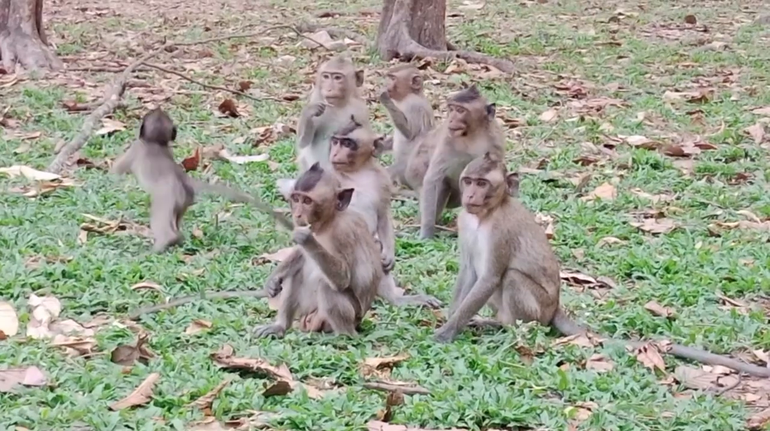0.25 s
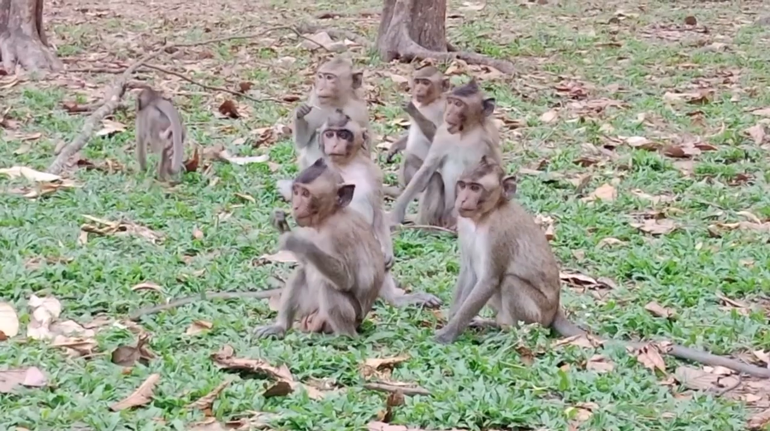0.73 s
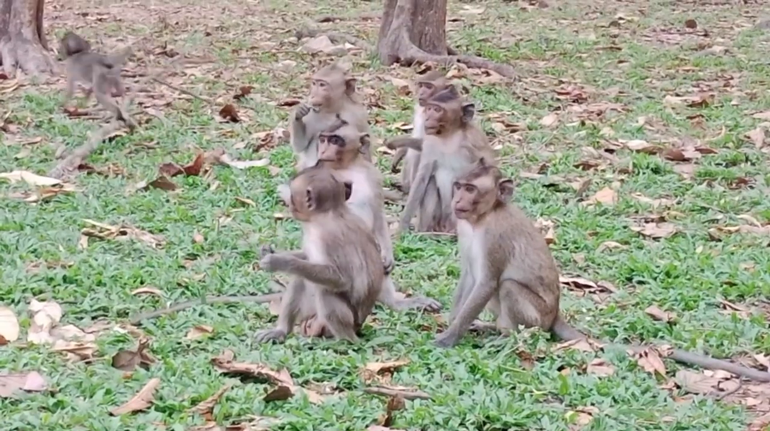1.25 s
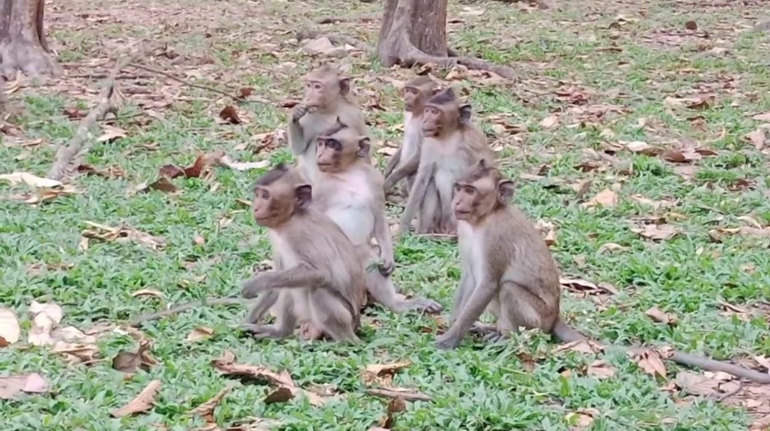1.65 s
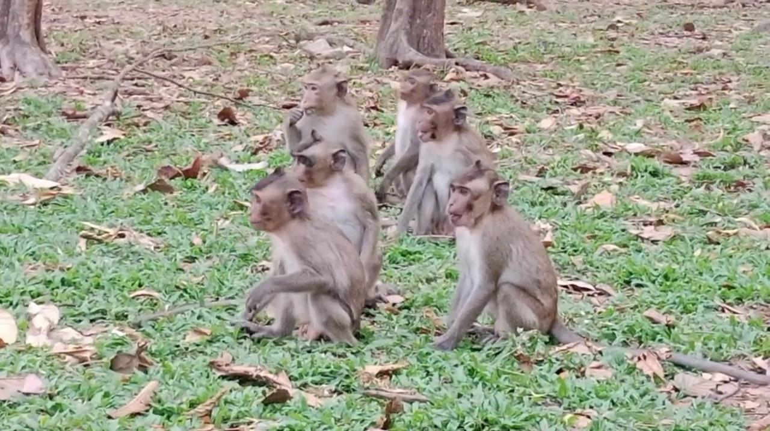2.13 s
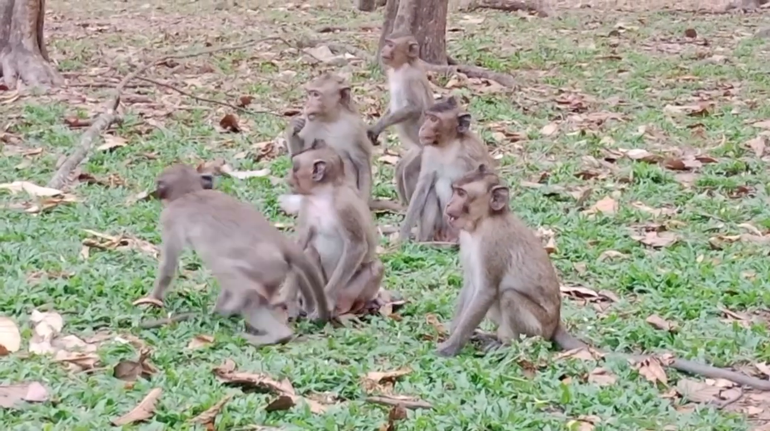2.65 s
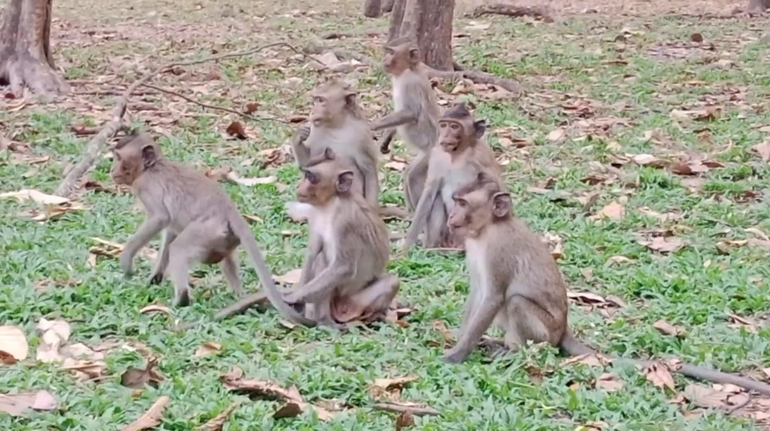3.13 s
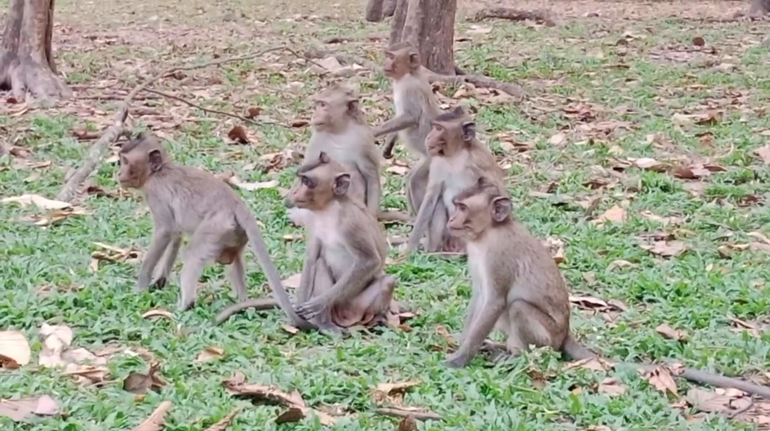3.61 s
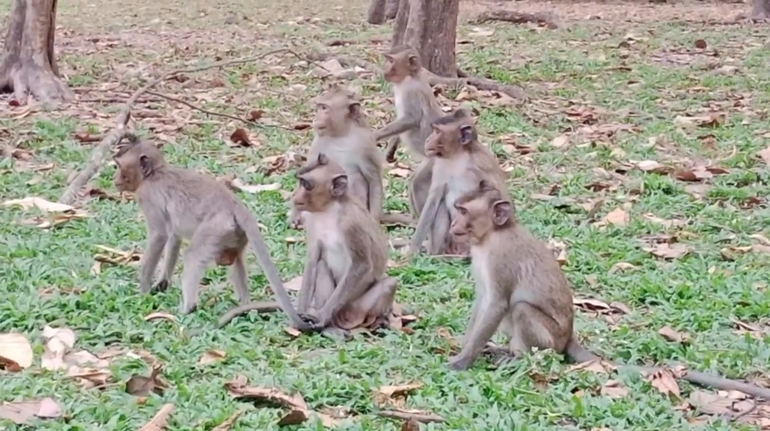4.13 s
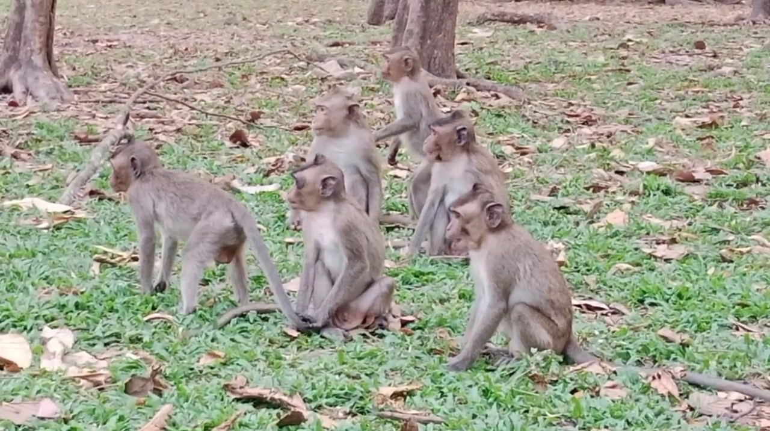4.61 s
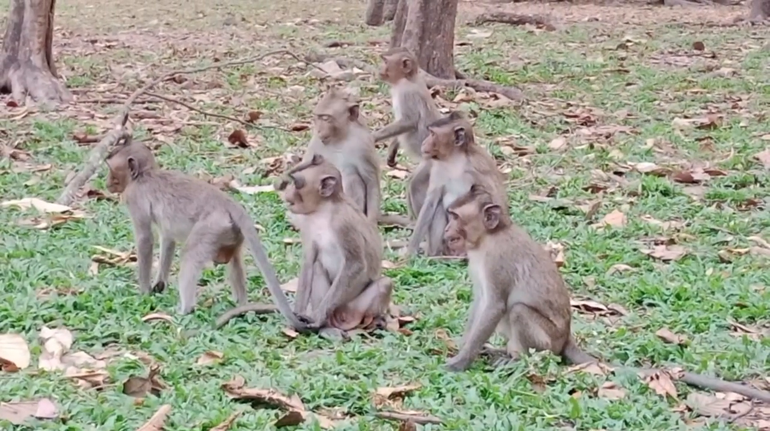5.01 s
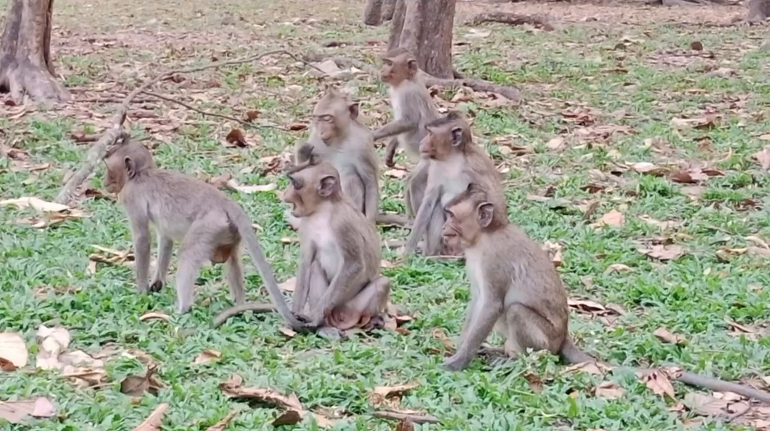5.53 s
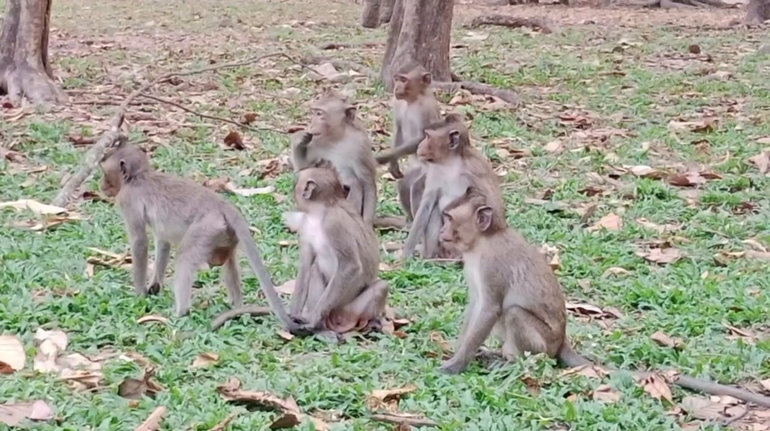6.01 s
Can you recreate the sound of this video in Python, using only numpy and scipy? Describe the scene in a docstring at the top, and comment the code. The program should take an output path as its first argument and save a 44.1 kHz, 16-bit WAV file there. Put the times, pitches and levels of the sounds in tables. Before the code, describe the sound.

A quiet open wood, heard from several metres away: faint airy noise, a low rumble in soft lumps, and patchy insect hiss around seven to eight kilohertz. From 0.7 s a far bird gives a tiny rising run of quick high notes, repeating about every second until 5.5 s. A dry leaf ticks near 0.9 s. At 1.1 s a macaque utters a soft stuttering chirp, then at 1.25 s a loud, very short bark that glides upward and turns hoarse, its echoes scattering off trunks. Faint whistles and peeps follow around 2.0 to 2.6 s. At 2.96 s comes a second bark, slightly lower, raspy and just as brief, with the same woody ringing tail. A leaf ticks at 3.3 s; more tiny ticks come from 4.1 to 5.4 s. A faint distant coo sags in pitch around 5.3 to 5.7 s, then the quiet background continues to 6.3 s.

```python
"""Two barks in an open wood

A monkey gives a soft stuttering chirp, then barks twice: harmonics of its folds, shaped by throat and mouth.
Single echoes and a tail of sparse taps from the trees throw the calls back. A far bird repeats a rising run of
notes; wavering sines coo and peep faintly; puffs of noise are ticking leaves and one more faint peep. Insects
hiss in bands of patchy noise and fuzzy tones, over air noise and a low rumble that comes in lumps."""
import sys
import numpy as np
from scipy import signal
from scipy.fft import rfft, irfft
from scipy.io import wavfile
from scipy.ndimage import uniform_filter1d

SR = 44100
rng = np.random.default_rng(int(sys.argv[2]) if len(sys.argv) > 2 else 0)


def invert_db(x):
    """Field ratio 10**(x/20) for x, a level in decibels (scalar or array-like)."""
    u = np.asarray(x, float) / 20
    return 10 ** u


def digitize_waveform(pressure):
    """Quantize a signal to 16-bit integers and store it at the path in sys.argv[1].

    Rows of a 2-D input are taken as channels; values are limited to [-1, 1].
    """
    field = np.atleast_2d(pressure).T
    bounded = np.clip(field, -1, 1)
    quanta = np.round(bounded * 32767).astype(np.int16)
    wavfile.write(sys.argv[1], SR, quanta)


N = 276066  # samples in the scene

# Colour of the chirp, first bark and second bark through throat and mouth.
# Each row: frequency in Hz, relative level in dB.
THROATS = [
    [(400, -52), (700, -14.5), (1060, -25), (1380, -1.5), (1720, -11), (2120, -2), (2700, -45.5),
     (4000, -80.5)],
    [(400, -59.5), (560, -35.5), (680, -22), (950, -18.5), (1300, -14.5), (1500, -4.5), (1750, 9.5),
     (2100, -8), (2420, -5.5), (2890, -15), (3300, -20.5), (4210, -32.5), (4850, -58.5), (6000, -42.5),
     (7000, -25.5), (8300, -40.5), (9300, -80), (11000, -60), (15000, -69.5)],
    [(400, -56), (540, -37), (660, -31.5), (830, -25.5), (1010, -23.5), (1280, 0.5), (1440, -3),
     (1650, 11.5), (2080, -7.5), (2570, 3.5), (2960, -6.5), (3600, -5.5), (4210, -35), (4800, -63),
     (5900, -29), (7400, -17.5), (8400, -37.5), (9300, -69.5), (11000, -57), (15000, -56.5)],
]
# Loudness of the lower insect chorus. Each row: time in seconds, rms level in dB.
LOWER_CHORUS_DB = [(0, -80), (.5, -83), (1, -78), (1.5, -72.5), (2.001, -78.5), (2.4, -80), (3, -81.5),
                   (3.4, -76), (4, -86.5), (5.001, -86.5), (5.5, -89.5), (6.26, -98.5)]
# Loudness of the upper insect chorus. Each row: time in seconds, rms level in dB.
UPPER_CHORUS_DB = [(0, -94), (1, -85), (2, -88.5), (2.6, -101.5), (3.4, -79), (4.001, -90), (4.9, -88.5),
                   (5.5, -79.5), (6.26, -93)]


def evened(x):
    """Scales to rms 1."""
    return x / np.sqrt(np.mean(x ** 2) + 1e-20)


def read(points, hz):
    """Reads a spectrum on a log-frequency axis."""
    f, value = np.transpose(points)
    return np.interp(np.log(hz + 1), np.log(f + 1), value)


def curve(points):
    """Reads a level curve over the whole scene."""
    return np.interp(np.arange(N) / SR, *np.transpose(points))


def add(mix, s, sound):
    """Mixes a sound in at time s, in seconds."""
    part = mix[round(s * SR):][:len(sound)]
    part += sound[:len(part)]


def coloured(x, spectrum):
    """Filters x by a spectrum in dB."""
    gain = invert_db(read(spectrum, np.fft.rfftfreq(len(x), 1 / SR)))
    return irfft(rfft(x) * gain, len(x))


def wander(length, smooth_s):
    """Slow random drift of rms 1."""
    return evened(uniform_filter1d(rng.standard_normal(length), max(round(smooth_s * SR), 2)))


def stack(turns, hz, throat, dull_db, knee_hz, count):
    """Harmonics 1 to count - 1, as loud as throat and mouth let through; the throat spreads their phases."""
    total = 0
    for k in range(1, count):
        # a narrow mouth takes dull_db per kHz over the first 2 kHz above the knee
        loss_db = dull_db * np.clip((k * hz - knee_hz) / 1000, 0, 2)
        level = invert_db(read(throat, k * hz) - loss_db)
        total = total + level * np.cos(2 * np.pi * k * turns + k * k)
    return total


def folds(hz, uneven, breath, dull_db, throat, pattern):
    """Jittered folds with strong and weak cycles, and a puff of breath in each cycle."""
    turns = np.cumsum(hz * (1 + .04 * breath * wander(len(hz), .001))) / SR
    strong_weak = 1 + uneven * np.cos(2 * np.pi * turns / pattern)
    tone = stack(turns, hz, throat, dull_db, 2600, count=24) * strong_weak
    puffs = (.3 + np.exp(-(turns % 1) / 2.6)) * rng.standard_normal(len(hz))
    return evened(tone) + breath * evened(coloured(puffs, throat))


def bark(rows, second_rows, voice_break, throat):
    """Folds glide up and break into strong and weak cycles; a second voice, one partial, joins."""
    calm_uneven, calm_breath, break_width_s = .06, .3, .004
    s, *columns = np.transpose(rows)
    s2, *second_columns = np.transpose(second_rows)
    t = np.arange(s[0], s[-1], 1 / SR)
    hz, effort_db, dull_db = (np.interp(t, s, c) for c in columns)
    second_hz, second_db = (np.interp(t, s2, c) for c in second_columns)

    break_s, broken_uneven, broken_breath, pattern = voice_break
    broken = .5 + .5 * np.tanh((t - break_s) / break_width_s)  # 0 calm, 1 broken
    uneven = calm_uneven + (broken_uneven - calm_uneven) * broken
    breath = calm_breath + (broken_breath - calm_breath) * broken
    first = folds(hz, uneven, breath, dull_db, throat, round(pattern))

    second_turns = np.cumsum(second_hz * (1 + 0.016 * wander(len(t), 0.0018))) / SR
    second = evened(stack(second_turns, second_hz, throat, dull_db, 1100, count=2))
    both = invert_db(effort_db) * first + invert_db(second_db) * second
    return s[0], both * signal.windows.tukey(len(t), .08)


def monkey_barks():
    """The near monkey's two barks, each with its own glide, second voice, break and throat."""
    # The folds, one table a bark. Each row: time in seconds, pitch in Hz, effort in dB,
    # treble loss in dB per kHz while the mouth is narrow.
    voices = [
        [(1.243, 482.6, -60, 28), (1.255, 506.5, -42, 22.5), (1.268, 568.4, -37.5, 22.5),
         (1.28, 631.3, -28.5, 17.5), (1.29, 647.7, -30, 6), (1.302, 668.6, -24.5, 1.5), (1.315, 713, -36, 1.5),
         (1.33, 665, -46, 19), (1.37, 634, -52, 27)],
        [(2.964, 418.3, -66.5, 20.5), (2.978, 470, -47.5, 16.5), (2.992, 536.4, -35.5, 5),
         (3.008, 569.7, -30.5, 8), (3.018, 633.7, -30, 1.5), (3.032, 672, -30, -2.5), (3.05, 636.5, -31.5, 2.5),
         (3.07, 614, -54, 16), (3.11, 596, -56, 25.5)],
    ]
    # Second voice of each bark, sinking to a low grunt at the end.
    # Each row: time in seconds, pitch in Hz, level in dB.
    second_voices = [
        [(1.243, 825, -63.5), (1.256, 768, -59), (1.27, 735, -63.5), (1.3, 946.7, -52.5), (1.324, 924, -49),
         (1.332, 695, -54.5), (1.37, 668, -47)],
        [(2.964, 750, -63.5), (2.978, 830, -56.5), (3.008, 863, -56.5), (3.04, 901, -52.5), (3.068, 826, -54),
         (3.076, 660, -51), (3.11, 590, -51.5)],
    ]
    # The voice breaks near the top of its glide. Each row: time in seconds, unevenness of cycles 0-1,
    # breath noise 0-1, cycles per strong-weak pattern.
    breaks = [(1.284, .9, .55, 3), (3.016, .7, .4, 2)]
    track = np.zeros(N)
    for parts in zip(voices, second_voices, breaks, THROATS[1:]):
        add(track, *bark(*parts))
    return track


def monkey_chirp():
    """Soft clear syllables of the same folds with even cycles, each opening fast and fading."""
    # Each row, one a syllable: start in seconds, length in seconds, level before the fade in dB,
    # start pitch in Hz, end pitch in Hz.
    syllables = [(1.118, 0.045, -67, 676, 655), (1.152, .022, -60, 612, 635),
                 (1.173, .022, -47.5, 708, 700), (1.2, 0.021, -65, 740, 745)]
    rise, fade_db, breath = .25, -8, .15  # rise as a share of the length
    track = np.zeros(N)
    for s, length, db, start_hz, end_hz in syllables:
        u = np.linspace(0, 1, round(length * SR))
        shape = np.minimum(u / rise, 1) * invert_db(db + fade_db * u) * signal.windows.tukey(len(u), .3)
        hz = start_hz + (end_hz - start_hz) * u
        add(track, s, shape * folds(hz, 0, breath, 0, THROATS[0], pattern=1))
    return track


def wood(x):
    """Single echoes, and clumps of sparse taps from scattered trunks, each band dying at its own speed."""
    # How long the wood rings. Each row: frequency in Hz, time to fall 60 dB in seconds.
    ringing = [(650, 0.27), (900, 0.9), (1320, 1.15), (1750, 0.98), (2600, 0.62), (3600, 0.92), (7000, 1.5)]
    # Echoes off trunks and the far edge of the wood. Each row: delay in seconds,
    # level in dB before the colour below.
    echoes = [(.022, -13.5), (0.046, -12.5), (.068, -17), (.095, -21.5), (0.128, -28), (.2, -34),
              (0.371, -39), (.42, -42.5)]
    # The animal sends lows and highs differently to the trees. Each row: frequency in Hz, gain in dB.
    colour = [(400, -1.5), (700, 7.5), (1000, 7.5), (1800, -1), (3000, -1), (4000, 2.5), (7500, 3),
              (12000, 1)]
    # one tap, up or down, somewhere in every 20 samples
    taps, at = np.zeros(2 * SR), np.arange(500, 2 * SR - 20, 20)
    taps[at + rng.integers(0, 20, len(at))] = rng.choice([-1., 1.], len(at))
    hz, t, z = signal.stft(taps, SR, nperseg=256)
    clumps = uniform_filter1d(rng.standard_normal(z.shape), 2, 0)
    clumps = evened(uniform_filter1d(clumps, 16, 1))
    decay_db = -60 * t / read(ringing, hz)[:, None]
    tail = signal.istft(z * invert_db(4.5 * clumps + decay_db), SR, nperseg=256)[1]
    tail *= invert_db(-7.0) / np.linalg.norm(tail)
    for delay, db in echoes:
        add(tail, delay, np.array([invert_db(db)]))
    return coloured(signal.fftconvolve(x, tail)[:N], colour)


def microphone(calls):
    """The microphone's colour on the monkey, the far bird and their echoes."""
    # Each row: frequency in Hz, gain in dB.
    response = [(300, -50), (500, -28), (600, 0), (4100, 0), (4800, -22), (5300, 0), (8500, 0), (9300, -20),
                (10200, -4), (16000, -4)]
    return coloured(calls, response)


def bird_run(db, start_hz, end_hz):
    """A quick run of short steady notes stepping upward."""
    steps = 5
    u = np.linspace(0, 1, round(.075 * SR), endpoint=False)
    step, within = np.divmod(u * steps, 1)
    hz = uniform_filter1d(start_hz + (end_hz - start_hz) * step / (steps - 1), 150)
    turns = np.cumsum(hz * (1 + .008 * wander(len(u), .004))) / SR
    shape = (.3 + np.sin(np.pi * within)) * signal.windows.tukey(len(u), .4)
    return invert_db(db + 4.0 * wander(len(u), .015)) * np.sin(2 * np.pi * turns) * shape


def far_bird():
    """A far bird repeats its rising run, each time at its own pitch and level."""
    # Each row: start in seconds, level before the note shape in dB, start pitch in Hz, end pitch in Hz.
    runs = [(.68, -74.5, 5310, 6530), (1.582, -83, 4977, 6460), (2.52, -80.5, 4980, 6650),
            (3.469, -79.5, 5130, 6418), (4.49, -80, 5151, 6580), (5.503, -76.5, 5200, 6896)]
    track = np.zeros(N)
    for s, db, start_hz, end_hz in runs:
        add(track, s, bird_run(db, start_hz, end_hz))
    return track


def whistle(hz, level):
    """A far near-sine that wavers a little in pitch and level; level is its rms before wavering."""
    turns = np.cumsum(hz * (1 + 0.0068 * wander(len(hz), 0.0088))) / SR
    return np.sqrt(2) * level * invert_db(3.4 * wander(len(hz), 0.0087)) * np.sin(2 * np.pi * turns)


def note(start, top, end, db, hz, sag_hz_per_s=0):
    """A whistle that swells towards its loudest moment and fades; silent if it ends before it starts."""
    t = np.arange(start, end, 1 / SR)
    swell = np.sin(np.pi * np.interp(t, [start, top, end], [0, .5, 1])) ** 1.2
    return start, whistle(hz - sag_hz_per_s * (t - start), invert_db(db) * swell)


def far_peeps():
    """Faint far whistles and peeps, each a swelling near-sine."""
    # Each row: start, loudest moment and end in seconds, level in dB, pitch in Hz.
    peeps = [(.952, 0.987, 1.1, -83.5, 976), (2.18, 2.254, 2.4, -82, 2150),
             (2.298, 2.309, 2.53, -67.5, 2190), (2.448, 2.468, 2.38, -67, 2180),
             (2.51, 2.535, 2.46, -77, 2160), (2.44, 2.47, 2.59, -69.5, 7125),
             (2.641, 2.656, 2.68, -74, 711), (2.64, 2.703, 3.4, -83, 7100), (2.846, 2.863, 3, -80.5, 696),
             (2.898, 2.937, 2.9, -81, 730), (4.08, 4.111, 4.22, -70.5, 507), (4.651, 4.664, 4.7, -84, 1913),
             (5.047, 5.08, 5.4, -86.5, 1287), (5.12, 5.157, 5.194, -84, 1750),
             (5.255, 5.28, 5.31, -79, 2340), (5.26, 5.281, 4.8, -79, 3120), (6.192, 6.218, 6.8, -78, 1880)]
    track = np.zeros(N)
    for row in peeps:
        add(track, *note(*row))
    return track


def far_coo():
    """A far coo of slowly sagging pitch, whose partials swell and fade apart."""
    # Each row: start, loudest moment and end in seconds, level in dB, multiple of the base pitch.
    partials = [(5.29, 5.326, 5.4, -76, 2), (5.365, 5.455, 5.54, -65.5, 2), (5.49, 5.57, 5.63, -69.5, 2),
                (5.62, 5.7, 5.74, -81, 2), (5.46, 5.49, 5.52, -80, 3), (5.535, 5.565, 5.6, -77, 3),
                (5.37, 5.43, 5.79, -78, 6)]
    base_hz, base_s, sag_hz_per_s = 614.4, 5.29, 25  # the base pitch holds at base_s
    track = np.zeros(N)
    for start, top, end, db, multiple in partials:
        k = round(multiple)
        hz = k * (base_hz - sag_hz_per_s * (start - base_s))
        add(track, *note(start, top, end, db, hz, k * sag_hz_per_s))
    return track


def falling_whistle():
    """One faint whistle falls in pitch while it swells, then weakens."""
    # Each row: time in seconds, pitch in Hz, level in dB.
    path = [(1.98, 2340, -84), (2.032, 2175, -74), (2.089, 2133, -65.5), (2.116, 2120, -75)]
    s, hz, db = np.transpose(path)
    t = np.arange(s[0], s[-1], 1 / SR)
    level = invert_db(np.interp(t, s, db)) * signal.windows.tukey(len(t), .15)
    track = np.zeros(N)
    add(track, s[0], whistle(np.interp(t, s, hz), level))
    return track


def leaf_ticks():
    """Dry leaves tick, and one faint far peep sounds at 5.26 s: each a dying puff of noise around one pitch."""
    # Each row: start in seconds, nominal peak in dB (the puff's rms starts from 4 dB less),
    # centre in Hz, time to fall 60 dB in seconds.
    ticks = [(.295, -69.5, 2900, 0.095), (.935, -53, 7450, 0.019), (2.18, -81.5, 13000, 0.025),
             (2.27, -79, 11200, 0.03362), (3.272, -53.5, 6650, 0.036), (4.11, -71.5, 3450, 0.29),
             (4.4, -62, 7300, 0.033), (4.949, -69, 12720, 0.0326), (4.95, -61.5, 7560, 0.053),
             (5.262, -73, 2962, 0.2483), (5.39, -64, 15490, 0.042)]
    t = np.arange(round(.15 * SR)) / SR
    track = np.zeros(N)
    for s, db, hz, t60 in ticks:
        puff = coloured(rng.standard_normal(len(t)), [(hz * .55, -60), (hz, 0), (hz * 1.5, -60)])
        decay = invert_db(db - 4 - 60 * t / t60)
        add(track, s, decay * evened(puff) * np.minimum(t / 0.0012, 1))
    return track


def single_insects():
    """Fuzzy narrow tones that drift in pitch and come and go, following both choruses."""
    # Insects that stand out. Each row: pitch in Hz, peak level before the swells in dB against the choruses.
    singers = [(6380, -10), (6850, -6), (7150, -10), (7600, -8.5), (7950, -8.5), (8200, -12.5)]
    blur, drift, swell_db, swell_s = .008, 0.019, 3.5, 0.12  # blur and drift as shares of the pitch
    out = np.zeros(N)
    for hz, db in singers:
        turns = np.cumsum(hz * (1 + blur * wander(N, 0.0023) + drift * wander(N, 0.46))) / SR
        swell = swell_db * np.clip(wander(N, swell_s), -3, 1.5)
        out += invert_db(db + swell) * np.sin(2 * np.pi * turns)
    return out * np.hypot(invert_db(curve(LOWER_CHORUS_DB)), invert_db(curve(UPPER_CHORUS_DB)))


def bed(spectrum, level_db, patchy_db, flicker_db, patch_hz, patch_s, size):
    """Noise with drifting patches and a flicker shared by all frequencies, on a level curve."""
    frames, bins = 4 * N // size + 5, size // 2 + 1
    a, b, patches = rng.standard_normal((frames, bins, 3)).T
    patches = uniform_filter1d(patches, round(patch_hz * size / SR) + 1, 0)
    patches = evened(uniform_filter1d(patches, round(patch_s * 4 * SR / size) + 1, 1))
    flicker = evened(uniform_filter1d(rng.standard_normal(frames), 4))
    shape_db = read(spectrum, np.fft.rfftfreq(size, 1 / SR))[:, None]
    z = (a + 1j * b) * invert_db(shape_db + patchy_db * patches + flicker_db * flicker)
    noise = signal.istft(z, nperseg=size, noverlap=3 * size // 4)[1][:N]
    return evened(noise) * invert_db(level_db)


def lower_chorus():
    """The lower insect chorus: a band of strongly patchy noise."""
    # Each row: frequency in Hz, relative level in dB per Hz.
    spectrum = [(5500, -30), (6150, -25.5), (6400, -2.5), (6800, 2), (7150, -3), (7500, -3), (7900, -19.5),
                (8400, -37)]
    return bed(spectrum, curve(LOWER_CHORUS_DB), 4.4, 1.9, 150, .08, size=512)


def upper_chorus():
    """The upper insect chorus: a narrower band of strongly patchy noise."""
    # Each row: frequency in Hz, relative level in dB per Hz.
    spectrum = [(7000, -31.5), (7500, -3), (7950, 0), (8300, -12), (8600, -16), (8900, -41)]
    return bed(spectrum, curve(UPPER_CHORUS_DB), 4.5, 1.2, 150, .05, size=512)


def rumble():
    """Low noise on a slow level with short lumps."""
    # Each row: frequency in Hz, relative level in dB per Hz.
    spectrum = [(15, -65.5), (25, -33.5), (136, 5), (152, -2.5), (177, -7), (226, -13.5), (349, -21.5),
                (380, -21.5), (450, -32), (580, -48.5), (990, -120)]
    # The slow level. Each row: time in seconds, level in dB.
    slow_db = [(0, -66.5), (.4, -62), (1, -68.5), (1.5, -59.5), (1.75, -68.5), (2.7, -67), (3.1, -70),
               (4.2, -69), (5.5, -69.5), (6.26, -72.5)]
    # The strongest lumps. Each row: time in seconds, height in dB over the slow level.
    lumps = [(.14, 6), (.35, 8), (0.931, 9.5), (1.31, 9.5), (1.39, 7), (1.57, 6), (1.699, 14.5), (2.04, 5),
             (3.04, 13), (3.19, 14.5), (3.4, 6.5), (3.66, 2), (4.18, 5), (4.74, 7), (5.07, 5.5)]
    lump_s = 0.019
    t = np.arange(N) / SR
    lumps_db = sum(db * np.exp(-((t - s) / lump_s) ** 2) for s, db in lumps)
    return bed(spectrum, curve(slow_db) + lumps_db, 1.8, 1.8, 60, 0.12, size=2048)


def air():
    """The air of the place: broad noise, strongest in the lows and mids."""
    # Each row: frequency in Hz, relative level in dB per Hz.
    spectrum = [(150, -30.5), (250, -2), (356, -1.5), (403, -16), (481, -6), (606, -13.5), (1390, -11.5),
                (1910, -11), (2570, -20.5), (3620, -19), (4820, -35), (6500, -23.5), (8450, -46),
                (14300, -120)]
    # Each row: time in seconds, rms level in dB.
    level = [(0, -75.5), (2, -76), (4.001, -75.5), (5.301, -77.5), (6.26, -78.5)]
    return bed(spectrum, curve(level), 1.6, .5, 150, .06, size=1024)


def top_hiss():
    """A faint hiss with a high insect band."""
    # Each row: frequency in Hz, relative level in dB per Hz.
    spectrum = [(8000, -35), (9200, -7), (10200, -7), (11000, 2.5), (11800, -6), (13500, -9), (14800, -4),
                (15200, -1), (16000, -7)]
    # Each row: time in seconds, rms level in dB.
    level = [(0, -95.5), (2, -95.5), (3.502, -94.5), (5.5, -93.5), (6.26, -93.5)]
    return bed(spectrum, curve(level), 0.89, 1.5, 500, .05, size=512)


def scene():
    """Near monkey, far bird and their echoes over small sounds and the steady beds."""
    near = monkey_barks() + monkey_chirp()
    far = far_bird()
    calls = microphone(near + far + wood(near + invert_db(0.5) * far))
    small = far_peeps() + far_coo() + falling_whistle() + leaf_ticks()
    insects = single_insects() + lower_chorus() + upper_chorus()
    beds = insects + rumble() + air() + top_hiss()
    return (calls + small + beds)[None]


def top_cut(x):
    """Nothing passes above the cut-off."""
    return signal.sosfilt(signal.butter(12, 15480, fs=SR, output="sos"), x)


def record(dry):
    """The finished mix as it is stored."""
    return top_cut(dry)


dry = scene()
out = record(dry)
digitize_waveform(out)
```